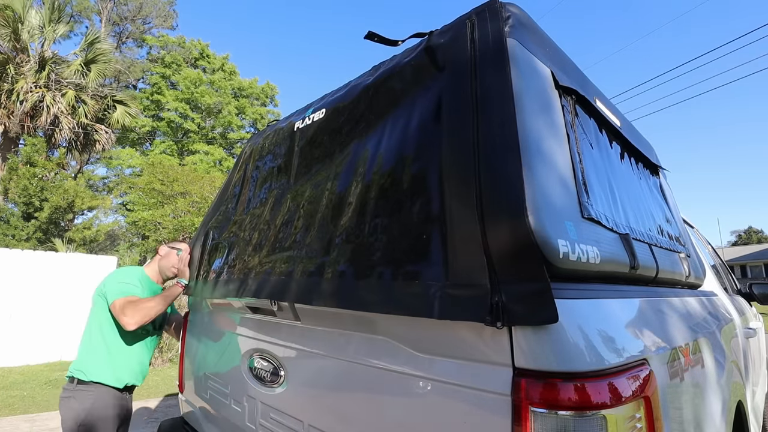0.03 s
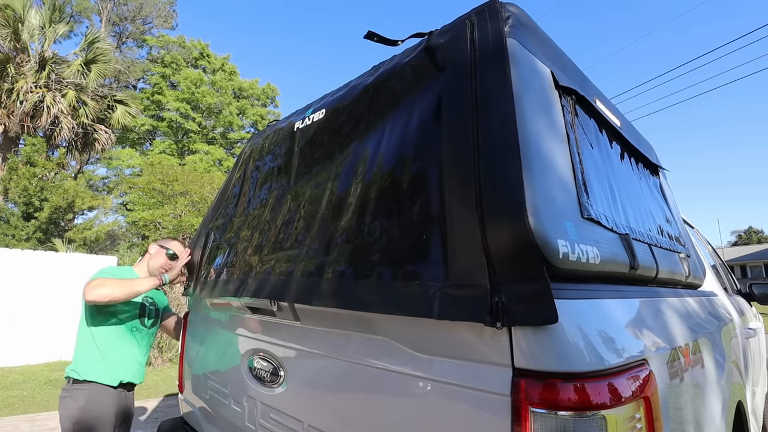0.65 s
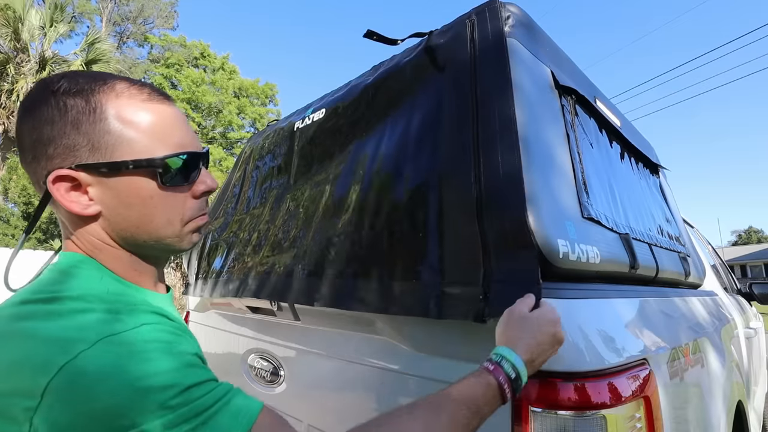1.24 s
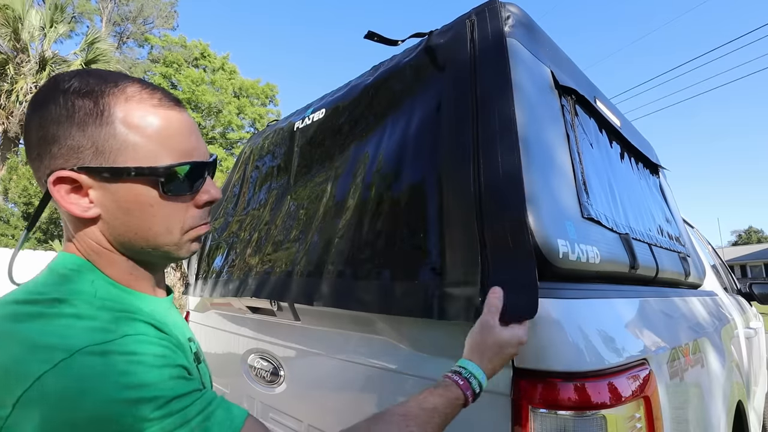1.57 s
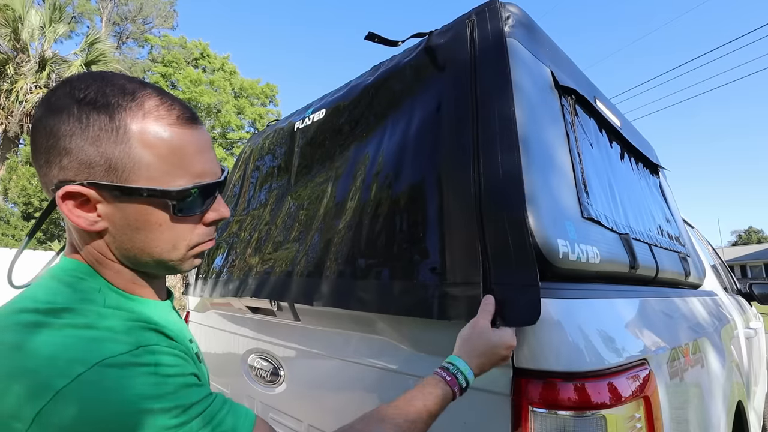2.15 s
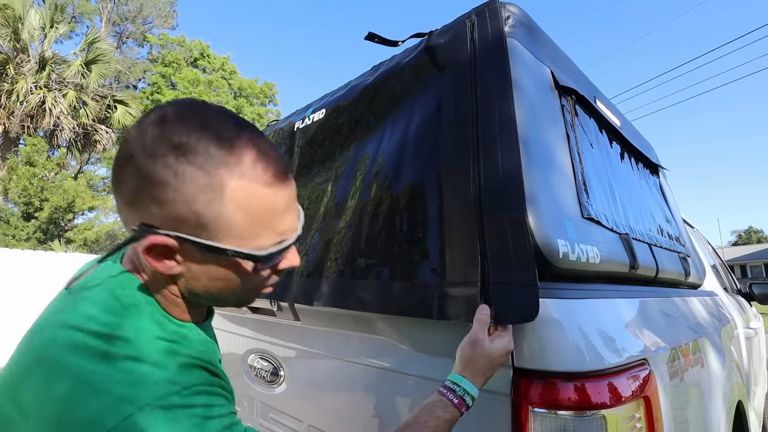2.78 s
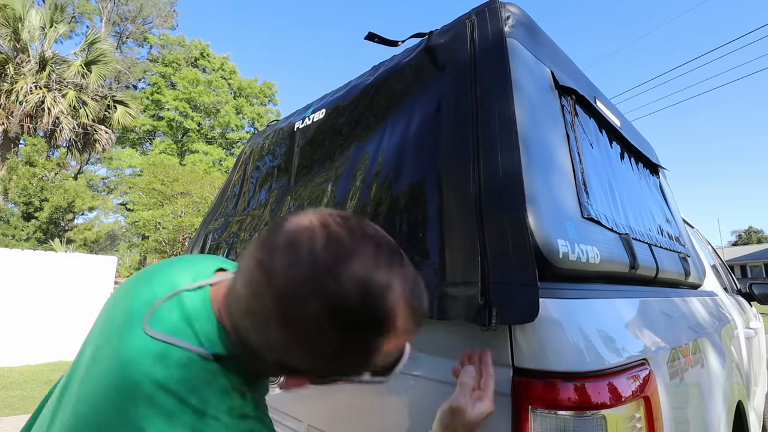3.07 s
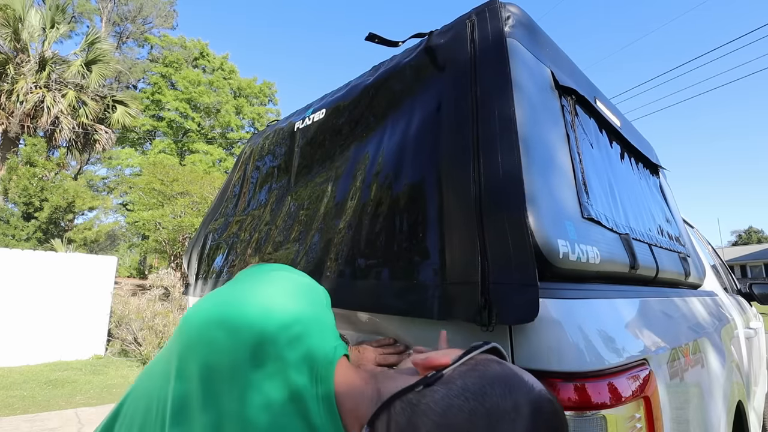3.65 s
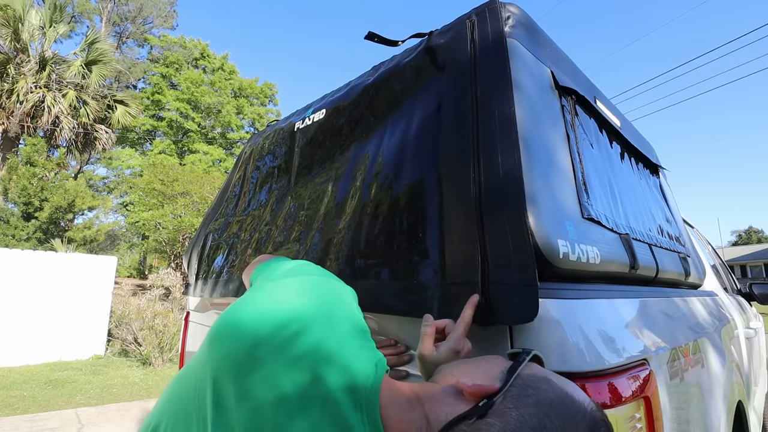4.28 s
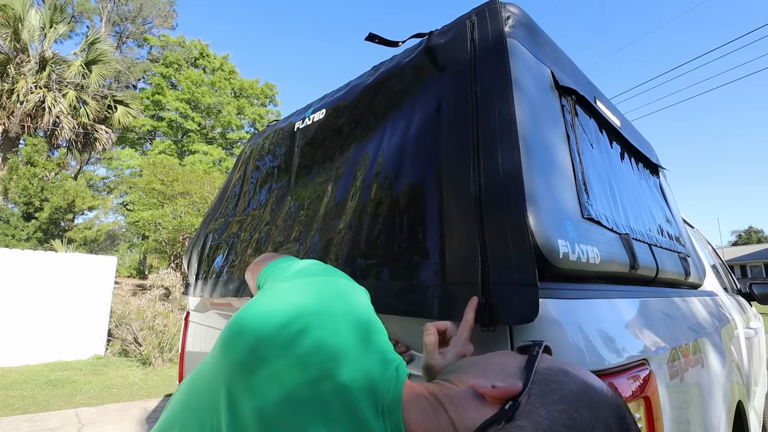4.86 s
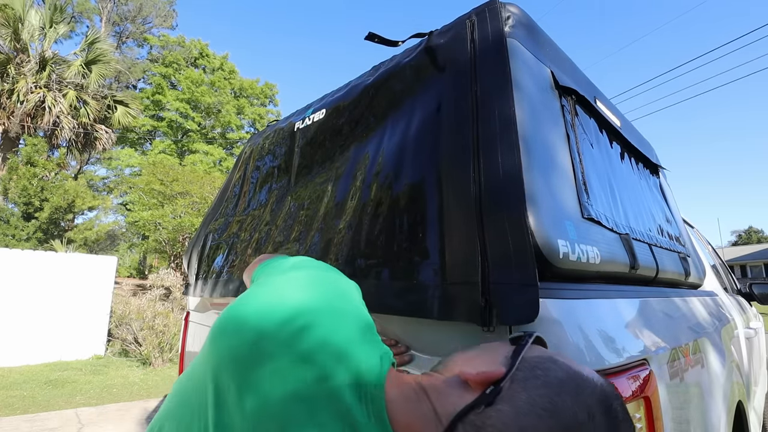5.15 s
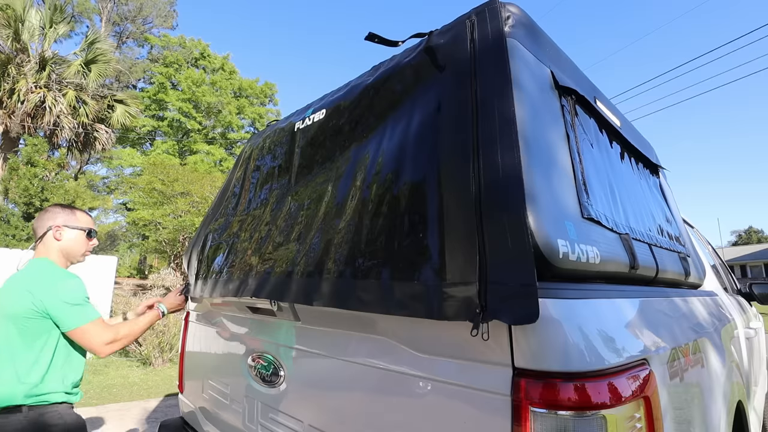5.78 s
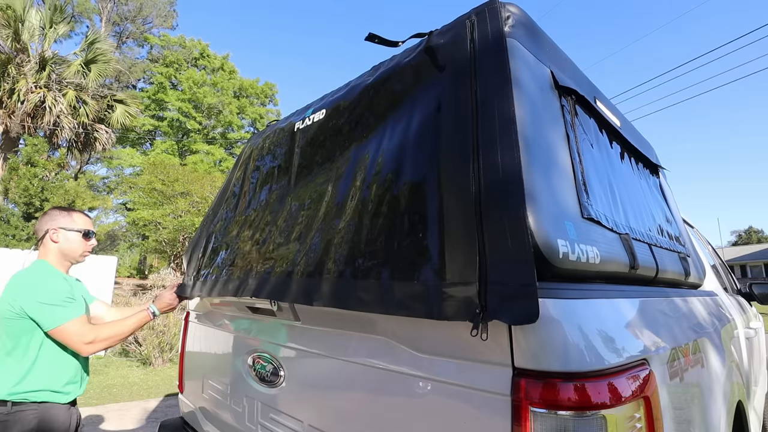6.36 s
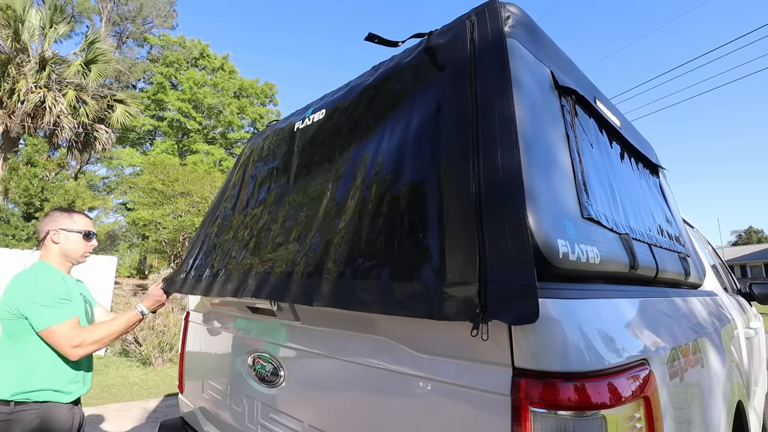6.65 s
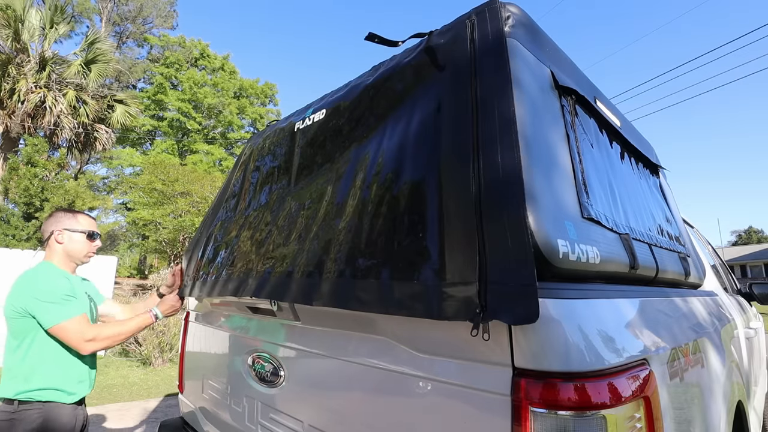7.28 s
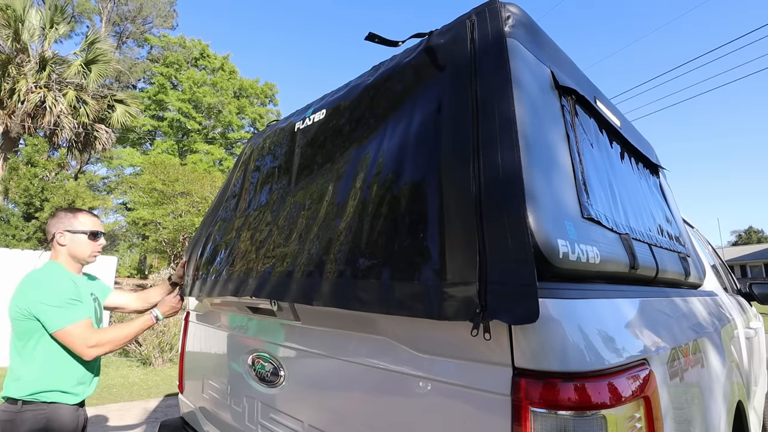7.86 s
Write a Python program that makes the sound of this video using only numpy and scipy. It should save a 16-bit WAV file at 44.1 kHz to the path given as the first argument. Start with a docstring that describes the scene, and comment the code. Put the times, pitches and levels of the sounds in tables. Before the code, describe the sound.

Faint fabric rustling opens over a quiet outdoor hum and light wind rumbling on the microphone. From about 1.1 to 1.4 seconds a hook-and-loop flap rips open close by, a crisp rasp with sharp snaps and drumming cloth, the loudest moment. Metal zipper pulls then jingle lightly on and off, with small clacks near 3 seconds, followed by a dull tailgate knock and a soft fabric flop. The pulls clack and jingle harder from 4.1 to 4.6 seconds. A few snaps and clicks come around 6 seconds, then a second flap rips, farther away and softer, from 6.3 to 6.8 seconds, its last corner giving way separately. The loose panel snaps and flops at 7 seconds and flops more gently at 7.6. Distant cars pass around 2 and 5 seconds, and a very faint bird whistles near 2.3 and 7 seconds.

```python
"""Opening a camper shell's fabric panel.

A hook-and-loop flap rips open close by, its hooks tearing loose in tugs that drum the taut cloth.
Two metal zipper pulls jingle and clack, then the far flap rips. Fabric snaps, rustles and flops
against the truck's tailgate; behind it are distant traffic, a light wind and a faint bird."""
import sys
import numpy as np
from scipy import signal
from scipy.fft import rfft, irfft
from scipy.io import wavfile

SR = 44100
rng = np.random.default_rng(int(sys.argv[2]) if len(sys.argv) > 2 else 0)


def bounce(signal):
    """Save signal as a 16-bit WAV file at the path given by the first command-line argument."""
    frames = np.transpose(np.atleast_2d(signal))
    limited = np.clip(frames, -1, 1)
    pcm = np.round(limited * 32767).astype(np.int16)
    wavfile.write(sys.argv[1], SR, pcm)


N = 354123
TIME = np.arange(N) / SR

# peel envelopes; the far flap's last corner holds, then gives: t/s, rasp level/dB, drum level/dB
NEAR_PEEL = [(1.182, -19.5, -34), (1.204, -33, -37), (1.216, -22, -37), (1.236, -23.5, -39.5),
             (1.268, -19, -23), (1.3, -28, -38.5), (1.31, -13, -34.5), (1.386, -20, -34.5),
             (1.397, -26, -38)]
FAR_PEEL = [(6.34, -30, -41.5), (6.39, -27.5, -36), (6.466, -30.5, -38), (6.512, -21.5, -37.5),
            (6.562, -24.5, -39.5), (6.582, -17, -39), (6.592, -29, -37), (6.602, -20.5, -30.5),
            (6.708, -19, -38), (6.72, -28, -29)]
CORNER_PEEL = [(6.762, -37, -44), (6.782, -12, -33.5), (6.8, -35, -45)]
# EQ of the hooks' rasp and the cloth's low drumming: f/Hz, level/dB
NEAR_RASP = [(500, -22), (1080, -25), (1280, 6), (1750, 2.5), (2150, 5), (2900, 0), (4000, 5), (6200, -1.5),
             (8800, -1), (10500, -14.5), (16000, -17)]
FAR_RASP = [(500, -20), (1300, -11), (2600, -1.5), (3700, 1), (6000, 1.5), (8000, -3), (9200, -3),
            (11000, -14.5), (13500, -19), (16000, -26)]
NEAR_DRUM = [(60, -40), (130, 3.5), (230, -6.5), (340, -1), (500, -4), (1000, -2), (1500, -8), (2100, -1.5),
             (3000, -11), (9000, -28)]
FAR_DRUM = [(60, -23), (160, -3), (330, -4.5), (530, 3), (750, -0.5), (950, -3.5), (2000, -0.5),
            (8000, -23)]

def flaps():
    """Two hook-and-loop flaps tear open: the near one tight and crisp, the far one denser and wetter."""
    near = rip(NEAR_PEEL, NEAR_RASP, NEAR_DRUM, tugs=24, hooks_per_s=4000, spread_db=2.5, clump_db=3,
               hold=0.73, hold_follows=2.9, rasp_t60=0.0067, tilt_db=1, brightening=0.9,
               drum_db=0, drum_t60=0.13, shiver_t60=0.053, shiver_db=-4)
    far_feel = dict(hooks_per_s=7000, spread_db=3.5, clump_db=2,
                    hold=0.84, hold_follows=0.29, rasp_t60=0.023, tilt_db=3, brightening=0.26,
                    drum_db=3.5, drum_t60=0.16, shiver_t60=0.077, shiver_db=-3.5)
    far = rip(FAR_PEEL, FAR_RASP, FAR_DRUM, tugs=19, **far_feel)
    corner = rip(CORNER_PEEL, FAR_RASP, FAR_DRUM, tugs=4, **far_feel)
    return amp(-0.87) * near + amp(-2) * reverb(far + corner, t60=0.28, wet_db=-17.5)


def rip(peel, rasp_eq, drum_eq, tugs, hooks_per_s, spread_db, clump_db, hold, hold_follows, rasp_t60,
        tilt_db, brightening, drum_db, drum_t60, shiver_t60, shiver_db, full_peel_db=-17.5):
    """A flap peels in uneven tugs, each tearing hooks loose in clumps and drumming the taut cloth."""
    out, t = np.zeros(N), TIME[:SR // 5]
    times, *levels = np.transpose(peel)
    hooks = grains(hooks_per_s, spread_db) * amp(clump_db * drift(450))
    gap = (times[-1] - times[0]) / tugs
    jitter = 0.35 * np.pad(rng.uniform(-1, 1, tugs - 1), 1)
    starts = times[0] + gap * (np.arange(tugs + 1) + jitter)
    for s, length in zip(starts, np.diff(starts)):
        rasp_db, low_db = (np.interp(s + length / 2, times, level) for level in levels)
        # the harder the pull, the brighter the tugs and the more they run together
        force_db = rasp_db - full_peel_db
        tug_eq = tilted(rasp_eq, tilt_db + brightening * force_db)
        hold_s = length * min(hold * amp(hold_follows * force_db), 1)
        released = np.maximum(t - hold_s, 0)
        torn = hooks[round(s * SR):][:len(t)]
        rasp = amp(rasp_db) * colour(unit(torn * fade(released, rasp_t60)), tug_eq)
        drum = amp(low_db + drum_db) * colour(unit(torn * fade(released, drum_t60)), drum_eq)
        tug = np.sqrt(length * SR / len(t)) * (rasp + drum)
        # the freed flap changes shape, so each tug rings in resonances of its own
        add(out, s, reverb(tug, shiver_t60, shiver_db))
    return out


# snap accents: t/s, level/dB, tilt/(dB per decade)
SNAPS = [(0.8654, -25.5, 2), (0.9554, -22, 3), (1.129, -12.5, 7), (1.1583, -16, 16), (1.1722, -6, 17),
         (1.177, -9.5, 6), (1.1916, -5, 3), (1.2149, -6.5, -4), (1.312, -6, 8), (1.3325, 1, 13),
         (1.3815, -6, 1), (1.896, -27, 16), (2.373, -30, -18), (2.8077, -28, -19), (3.247, -29, 10),
         (4.541, -31, -13), (4.9498, -29, -25), (5.746, -24, -10), (5.9613, -20.5, -3),
         (6.0133, -18.5, -10), (6.0491, -23.5, -10), (6.306, -17.5, 14), (6.327, -18, 0), (6.99, -31, -8),
         (7.008, -16.5, 16), (7.024, -18, -19), (7.041, -17, -21)]
# snap EQ: f/Hz, level/dB
SNAP_EQ = [(200, -13), (900, 0), (1500, 6), (2600, 4.5), (4200, 7), (8500, -3), (11000, -13.5),
           (16000, -25)]

def snaps(crack_t60=0.0085, shiver_t60=0.18, shiver_db=-22):
    """Hooks and stiff cloth snap: a sharp crack with a short shiver of fabric behind it."""
    out, t = np.zeros(N), TIME[:SR // 16]
    envelope = fade(t, crack_t60) + amp(shiver_db) * fade(t, shiver_t60)
    for s, db, tilt_db in SNAPS:
        burst = rng.standard_normal(len(t)) * envelope
        add(out, s, at_peak(colour(burst, tilted(SNAP_EQ, tilt_db)), db))
    return out


# clear touches of the zipper pulls: t/s, main level/dB, low-mode level/dB
JINGLES = [(1.2625, -16, -32), (1.2824, -14, -31), (1.3813, -20, -34), (1.5384, -30, -36),
           (1.6347, -30.5, -35), (1.68, -39, -38.5), (1.7772, -42, -40), (2.1097, -31.5, -52),
           (2.1311, -26.5, -46.5), (2.2628, -49, -46), (2.7387, -34.5, -54), (2.8654, -41, -44),
           (2.9158, -37, -43), (2.9437, -23.5, -29.5), (2.9662, -30.5, -34.5), (3.1128, -34.5, -43),
           (4.0811, -45, -33.5), (4.155, -31, -29.5), (4.1979, -23, -45), (4.2672, -28.5, -35.5),
           (4.3276, -19.5, -31), (4.3395, -21.5, -47), (4.368, -23, -32.5), (4.439, -47, -36),
           (4.4697, -39.5, -40), (4.579, -31, -42), (4.9387, -51, -45)]
# the pulls swing on, touching lightly: start t/s, end t/s, main level/dB, low-mode level/dB
SWINGS = [(1.801, 2.424, -51, -53), (4.621, 4.899, -57, -50.5)]
# modes of the two pulls ringing freely: f/Hz, level/dB, t60/s
PULL_MODES = [(3502, -2.5, 0.035), (3658, 2.5, 0.046), (5480, -14.5, 0.11), (8200, -29, 0.036),
              (8837, 4, 0.031), (8744, 3.5, 0.039), (8900, 2, 0.024), (11700, 3.5, 0.11),
              (11800, -18, 0.055), (14500, -4, .09)]

def zipper_pulls(bounces_per_s=700, bounce_t60=0.081, detune_hz=45, free_db=-17, ordinary_db=-29):
    """The dangling pulls touch, chatter and ring; harder touches wake their high modes."""
    out, t = np.zeros(N), TIME[:SR // 6]
    light_touches = []
    for start, end, main_db, low_db in SWINGS:
        for k in range(6):
            s = start + (end - start) * (k + rng.random()) / 6
            light_touches.append((s, rng.normal(main_db, 4), rng.normal(low_db, 4)))
    for s, main_db, low_db in JINGLES + light_touches:
        bounces = rng.random(len(t)) < bounces_per_s / SR
        chatter = bounces * rng.standard_normal(len(t)) * fade(t, bounce_t60)
        chatter[0] = 0.85  # first contact
        # after a light touch the pulls stay in contact, damping and detuning each other
        freedom = amp(0.074 * (main_db - free_db))
        high_db = low_db - 5 + 0.63 * (main_db - ordinary_db)
        for hz, db, t60 in PULL_MODES:
            band_db = low_db - 1 if hz <= 7000 else main_db - 3 if hz <= 10500 else high_db
            mode = ring([(rng.normal(hz, detune_hz / freedom), 0, t60 * freedom)], t)
            tone = signal.fftconvolve(chatter, mode)[:len(t)]
            add(out, s, at_peak(tone, db + band_db))
        ticks = np.diff(at_peak(chatter, main_db - 17), prepend=0)
        add(out, s, ticks)
    return out


# sliders hit each other and the tailgate: t/s, level/dB, tilt/(dB per decade)
CLACKS = [(2.739, -28.5, 0), (2.917, -24.5, 4), (2.9453, -21.5, -7.5), (3.1117, -22, -8),
          (4.155, -10.5, 3.5), (4.265, -22, -5.5), (4.327, -8.5, 4.5), (4.4581, -27.5, -9.5),
          (4.551, -26.5, -5), (4.577, -30.5, -4), (5.772, -21, -4.5), (5.965, -24.5, -7)]
# clack EQ: f/Hz, level/dB
CLACK_EQ = [(150, -16), (400, 4.5), (900, -0.5), (1300, 8), (1750, 8.5), (2700, 0.5), (3700, 1.5),
            (4800, -4.5), (7000, -4), (9300, 3.5), (10800, -7.5), (15500, -7)]
# ring of the slider bodies: f/Hz, level/dB, t60/s
SLIDER_MODES = [(1744, -21.5, 0.23), (5210, -26, 0.26)]

def slider_clacks(crack_t60=0.012, hard_db=-6.5, rebound_s=0.013, dulling_db=4.4):
    """A metal crack, a rattle of slider and teeth, two duller rebounds; hard hits rattle and ring more."""
    out, t = np.zeros(N), TIME[:SR // 5]
    for s, first_db, tilt_db in CLACKS:
        loss_db = 5 + 0.49 * (hard_db - first_db)  # lighter knocks rebound less
        for k in range(3):
            hit_db = first_db - k * loss_db
            force_db = hit_db - hard_db
            rattle = amp(-7) * fade(t, t60=0.22 * amp(0.5 * force_db))
            burst = rng.laplace(size=len(t)) * (fade(t, crack_t60) + rattle)
            clack = colour(burst, tilted(CLACK_EQ, tilt_db - k * dulling_db))
            body = amp(hit_db + force_db) * ring(SLIDER_MODES, t)
            add(out, s + k * rebound_s, at_peak(clack, hit_db + 1) + body)
    return out


# knocks on the tailgate and flops of the loose panel: t/s, level/dB
KNOCKS = [(1.257, -24), (1.31, -20.5), (1.345, -37), (3.248, -22), (3.264, -23), (5.39, -34)]
FLOPS = [(1.405, -40.5), (3.412, -29.5), (3.448, -31), (7.023, -22), (7.040, -21.5), (7.615, -28),
         (7.645, -34)]
# body resonances of each: f/Hz, level/dB, t60/s
TAILGATE_MODES = [(203, -15, 0.13), (328.4, -4, .19), (426, -10, .07), (559, -16.5, 0.11), (697, -9, 0.081),
                  (820, -10, 0.046)]
PANEL_MODES = [(122, -9, 0.12), (179.5, -0.5, 0.2), (226, -6.5, 0.18), (284, -2, 0.073), (396, -4.5, 0.048),
               (537, -7, 0.039)]

def thuds(blows, modes, contact_s):
    """Soft blows swell during contact and ring in the low modes of a surface."""
    out, t = np.zeros(N), TIME[:SR // 3]
    attack = 1 - np.exp(-t / contact_s)
    for s, db in blows:
        add(out, s, amp(db) * attack * ring(modes, t))
    return out


# hand strokes over the fabric: centre t/s, half-width/s, level/dB
STROKES = [(0.012, 0.11, -49), (0.413, 0.051, -47), (0.768, 0.032, -45), (1.11, 0.16, -44.5),
           (1.587, 0.027, -37), (1.995, 0.29, -51), (2.916, 0.25, -53), (3.4, 0.091, -45.5),
           (4.69, 0.18, -61), (5.765, 0.036, -43.5), (6.254, 0.22, -51), (7.043, 0.036, -44),
           (7.614, 0.015, -47.5)]
# rustle EQ: f/Hz, level/dB
RUSTLE_EQ = [(200, -11.5), (900, 6.5), (2000, 4), (4500, -3), (8500, -4.5), (11000, -11), (16000, -16)]

def rustle(clump_db=3):
    """Fibres catch and slip in clumps under each stroke of the hand."""
    slips = unit(grains(per_s=6000, spread_db=3.5) * amp(clump_db * drift(120)))
    return colour(slips * swells(STROKES), RUSTLE_EQ)


# distant pass-bys: nearest t/s, half-width/s, level/dB
CARS = [(2.02, 0.37, -41), (5.22, 0.59, -45)]
# tyre EQ: f/Hz, level/dB
TYRE_EQ = [(150, -9.5), (600, -8.5), (800, 0), (960, 3.5), (1250, -0.5), (1600, -7.5), (2800, -20.5),
           (6000, -40), (16000, -63)]

def traffic():
    """Tyre noise swells and sinks as far cars pass."""
    return colour(rng.standard_normal(N), TYRE_EQ) * swells(CARS)


# wind envelope: t/s, level/dB
WIND_LEVELS = [(0, -49), (.8, -43), (2.5, -45.5), (3.2, -44.5), (3.9, -51), (4.8, -46.5), (5.5, -46),
               (5.8, -60), (7.3, -60), (7.7, -54), (8.03, -66)]
# rumble EQ: f/Hz, level/dB
WIND_EQ = [(10, -8.5), (25, 0), (50, -4), (90, -6), (200, -12.5), (500, -39), (2000, -83)]

def wind(gust_db=2):
    """Light wind rumbles on the microphone in uneven gusts."""
    level_db = np.interp(TIME, *np.transpose(WIND_LEVELS)) + gust_db * drift(9.2)
    return colour(rng.standard_normal(N), WIND_EQ) * amp(level_db)


# bird calls: t/s, length/s, start f/Hz, end f/Hz, level/dB
WHISTLES = [(2.248, 0.36, 3280, 3370, -56), (2.4, 0.2, 3420, 3610, -57), (6.897, 0.067, 2940, 2970, -54),
            (7.085, 0.058, 3480, 3390, -54)]

def bird(trim_db=-2):
    """A far bird's thin whistles glide and waver, blurred by distance."""
    out, waver = np.zeros(N), 1 + 0.0064 * drift(99)
    for s, length, start_hz, end_hz, db in WHISTLES:
        along = np.linspace(0, 1, round(length * SR))
        hz = (start_hz + (end_hz - start_hz) * along) * waver[:len(along)]
        tone = np.sin(2 * np.pi * np.cumsum(hz) / SR)
        add(out, s, amp(db + trim_db) * np.sin(np.pi * along) * tone)
    return reverb(out, t60=0.4, wet_db=-4)


# EQ of the ambience bed: f/Hz, level/dB
TOWN_EQ = [(25, -13), (70, -2), (115, 3.5), (160, -3.5), (210, -1), (310, -6.5), (1000, -5), (1800, -15),
           (3500, -22.5), (8700, -28), (9200, -21), (10100, -20), (10400, -29.5), (16000, -33.5)]

def town_hum(level_db=-45.5, waver_db=0.2):
    """A nearly steady bed of distant town hum and high hiss."""
    return colour(rng.standard_normal(N), TOWN_EQ) * amp(level_db + waver_db * drift(3.1))


def amp(db):
    """Decibels to gain."""
    return 10 ** (np.asarray(db) / 20)


def unit(x):
    """Scale to rms 1."""
    return x / np.sqrt(np.mean(x ** 2) + 1e-20)


def at_peak(x, db):
    """Scale to a peak level."""
    return amp(db) * x / np.abs(x).max()


def fade(t, t60):
    """Exponential decay, 60 dB down at t60."""
    return np.exp(-np.log(1000) * t / max(t60, 1e-4))


def swells(rows):
    """An envelope of bell-shaped rises and falls."""
    return sum(amp(db) * np.exp(-0.5 * ((TIME - s) / half) ** 2) for s, half, db in rows)


def add(out, s, sound):
    """Mix a sound in at time s."""
    start = max(round(s * SR), 0)
    out[start:start + len(sound)] += sound[:N - start]


def colour(x, eq, size=4096):
    """Minimum-phase EQ through (Hz, dB) points; white noise keeps its power."""
    hz, db = np.transpose(eq)
    grid = np.maximum(np.arange(size // 2 + 1) * SR / size, 1)
    gains = amp(np.interp(np.log(grid), np.log(hz), db))
    cepstrum = irfft(np.log(gains))
    cepstrum[1:size // 2] *= 2
    cepstrum[size // 2 + 1:] = 0
    response = irfft(np.exp(rfft(cepstrum)))
    return signal.fftconvolve(x, response / np.linalg.norm(response))[:len(x)]


def tilted(eq, db_per_decade):
    """Tilt an EQ: brighter for a hard contact, duller for a soft one."""
    return [(hz, db + db_per_decade * np.log10(hz)) for hz, db in eq]


def drift(per_s):
    """Random modulation, gliding to per_s new values a second."""
    knots = rng.standard_normal(N // 20)
    return np.interp(TIME * per_s, np.arange(len(knots)), knots)


def grains(per_s, spread_db):
    """Random clicks of uneven size, rms 1."""
    sizes = amp(spread_db * np.minimum(rng.exponential(1, N), 4)) * rng.choice([-1, 1], N)
    return unit(sizes * (rng.random(N) < per_s / SR))


def ring(modes, t):
    """Decaying sines with random phases and slightly uneven strengths."""
    return sum(amp(db + rng.normal()) * np.sin(2 * np.pi * (hz * t + rng.random())) * fade(t, t60)
               for hz, db, t60 in modes)


def reverb(x, t60, wet_db):
    """The direct sound plus dense, dying reflections."""
    t = TIME[:SR // 2]
    tail = rng.standard_normal(len(t)) * fade(t, t60)
    return x + amp(wet_db) * signal.fftconvolve(x, tail / np.linalg.norm(tail))[:len(x)]


def scene():
    """Handling sounds reflect faintly off the truck and yard, over the outdoor ambience, in mono."""
    rips = flaps()
    metal = zipper_pulls() + slider_clacks()
    knocks = thuds(KNOCKS, TAILGATE_MODES, contact_s=0.00079)
    flops = amp(-4.5) * thuds(FLOPS, PANEL_MODES, contact_s=0.003)
    handling = reverb(rips + snaps() + metal + knocks + flops + rustle(), t60=0.41, wet_db=-20.5)
    return (handling + traffic() + wind() + bird() + town_hum())[None]


def record(dry):
    """Peaks clip at full scale, then a steep low-pass cuts the top."""
    cutoff_hz = 15850
    lowpass = signal.ellip(10, 0.1, 80, cutoff_hz, fs=SR, output="sos")
    return signal.sosfilt(lowpass, np.clip(dry, -1, 1))


dry = scene()
out = record(dry)
bounce(out)
```